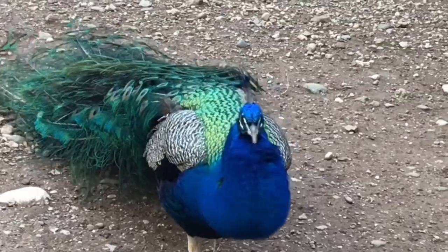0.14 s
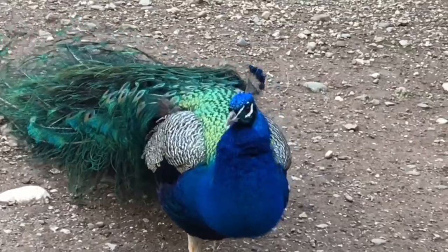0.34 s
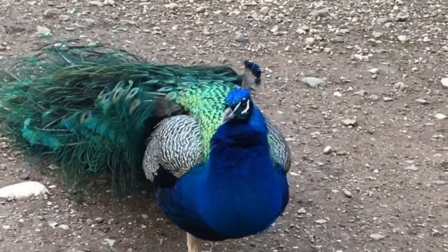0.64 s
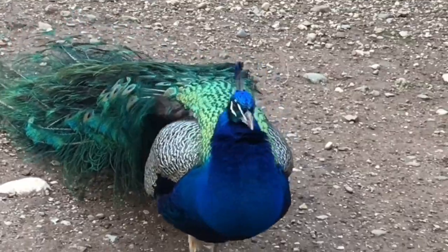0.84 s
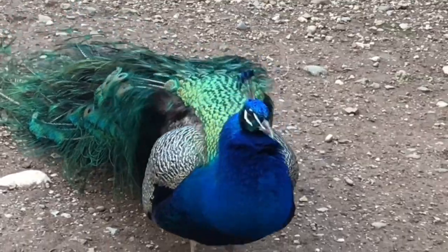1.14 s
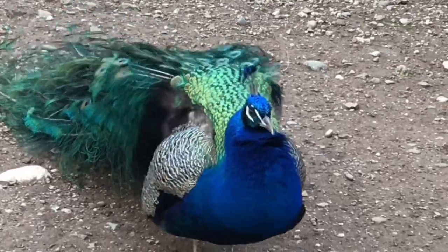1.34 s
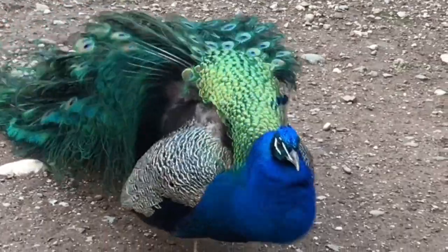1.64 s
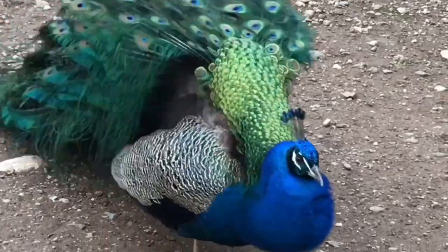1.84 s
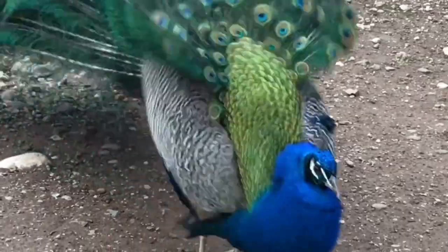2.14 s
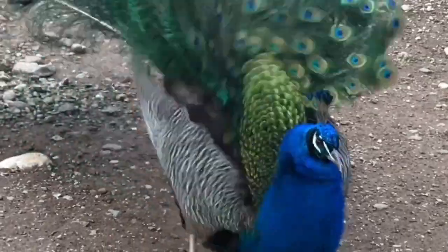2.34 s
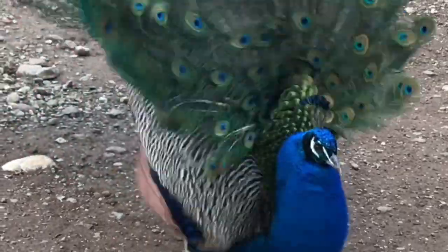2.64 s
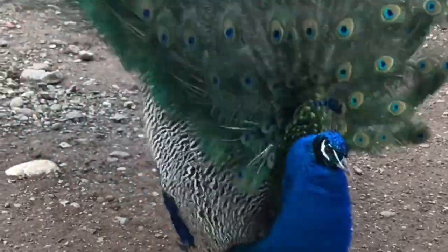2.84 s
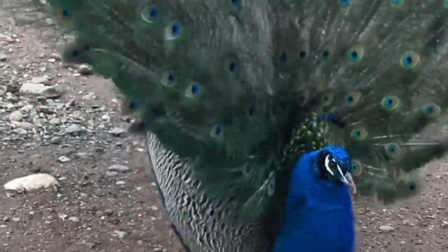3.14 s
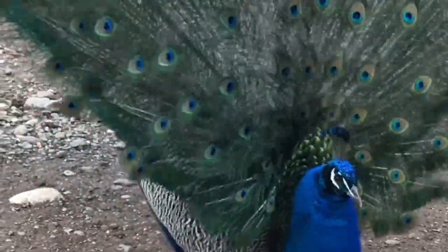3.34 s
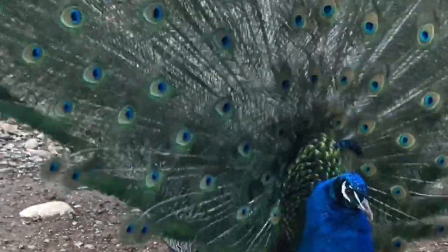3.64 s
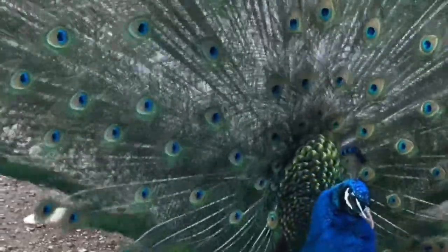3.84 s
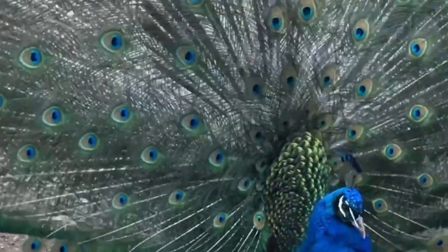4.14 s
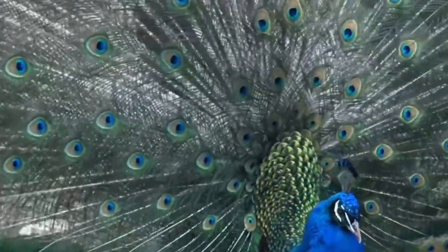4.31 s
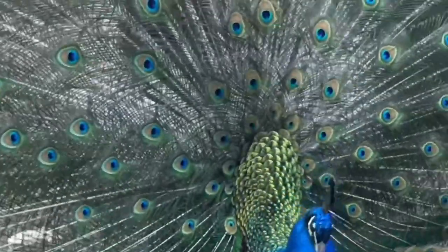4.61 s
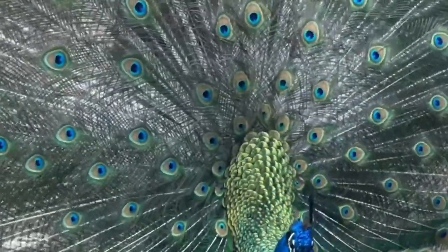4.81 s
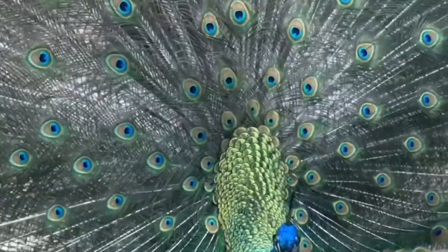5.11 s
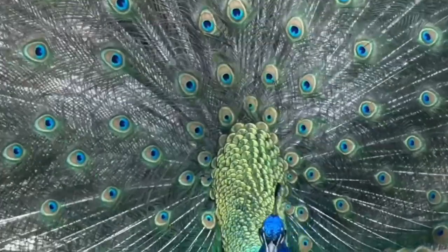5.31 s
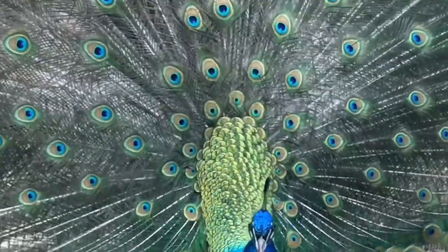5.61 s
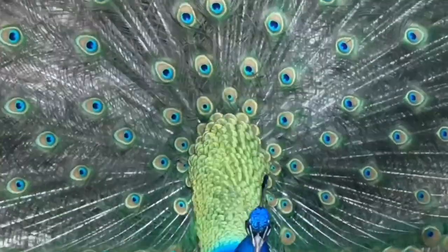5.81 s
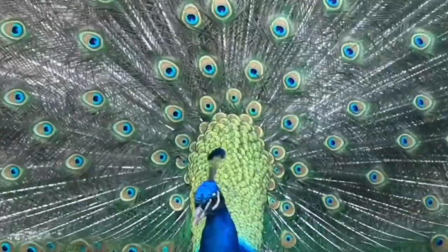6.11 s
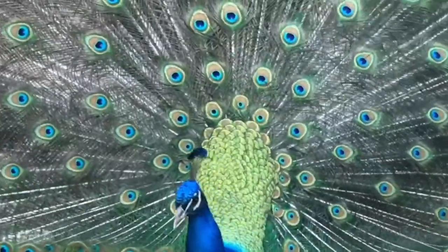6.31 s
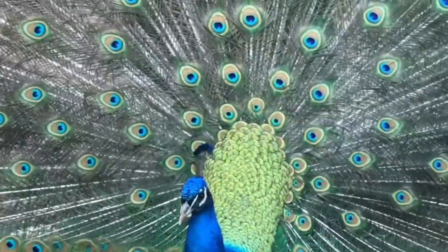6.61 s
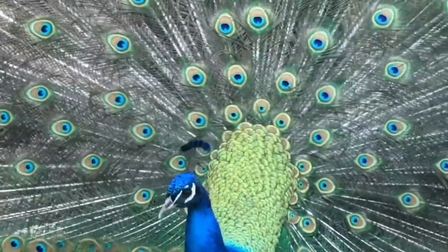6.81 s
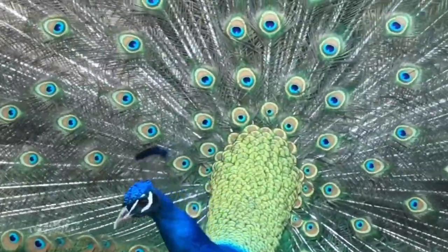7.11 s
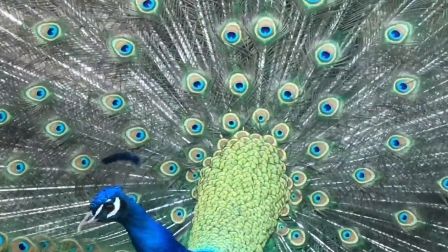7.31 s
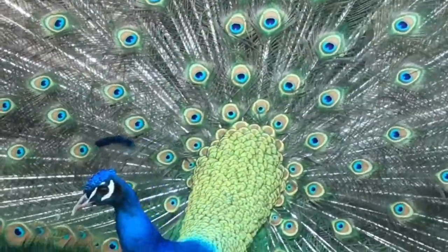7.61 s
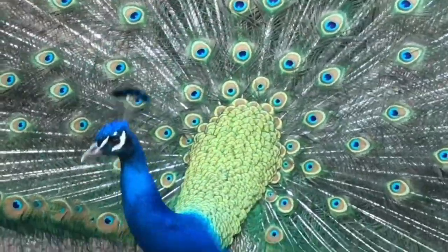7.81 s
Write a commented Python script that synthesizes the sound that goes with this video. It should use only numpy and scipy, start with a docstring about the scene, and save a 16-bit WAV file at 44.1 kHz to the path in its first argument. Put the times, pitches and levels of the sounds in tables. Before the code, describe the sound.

An open yard with soft air noise and a thin, very high insect hiss that briefly drops out near 0.8, 2.4 and 5.6 s. From the start small birds give regular falling chips and slurs, with a very faint warbling behind until about 2.4 s. At 2.4 s a dry, grainy feather rustle begins and slowly fades; quick bright twitters cluster at 2.5-3.2 s and a distant crow caws at 2.6 and 3.4 s. A pebble clicks at 3.2 s. A near peacock wails at 3.6-4.7 s, very loud: a quick scoop, a break upward, a long nasal arch, then hoarse and fluttering as it falls. A far peacock calls faintly at 3.3-4.3 and 5.0-5.7 s, with sparse twitters. The second near wail runs 6.1-7.3 s, with a thin squeal at 6.5 s and a coarse crack at 7.0 s; a caw hides beneath at 6.8 s. A faint high bird whistle follows at 7.6 s.

```python
"""Small birds chirp over an insect hiss in an open yard; then a peacock a metre or two away wails, long and loud, twice.
Each wail is a harmonic series on an arched pitch; the second harmonic carries it and flutters where the voice slips.
Roughness shakes the overtones and turns part of them to hiss pulsed at the pitch.
The train rustles as shaped noise, a pebble knocks as decaying modes, and a crow caws as pulses through resonances.
Another peacock calls far off, reduced to four harmonics; the small birds are gliding, nearly pure tones."""
import sys
import numpy as np
from scipy import signal
from scipy.fft import rfft, irfft, next_fast_len
from scipy.io import wavfile
from scipy.ndimage import uniform_filter1d, minimum_filter1d

SR = 44100
rng = np.random.default_rng(int(sys.argv[2]) if len(sys.argv) > 2 else 0)


def to_wav(sig):
    """Store sig (one row per channel, or 1-D mono) as 16-bit WAV at the path in sys.argv[1].

    Samples outside -1..1 are clipped; the rate is SR.
    """
    pcm = np.clip(np.atleast_2d(sig), -1, 1) * 32767
    pcm = np.round(pcm).astype(np.int16)
    wavfile.write(sys.argv[1], SR, pcm.T)  # frames by channels


N = 350595
TIME = np.arange(N) / SR

# spectrum of the open air: f/Hz, relative level per Hz/dB
AIR = [(25, -1.5), (50, -2.5), (90, -1.5), (170, -2), (280, -10), (600, -10.5), (1100, -18), (2000, -21.5),
       (2700, -21), (3500, -9.5), (4600, -16), (6100, -14), (6900, -32.5), (8600, -21)]
AIR_DB = -44
# dull wash of the distant surroundings: t/s, level/dB
DISTANCE = [(0, -67), (1.8, -69), (2.3, -52), (4.8, -49), (5.7, -51.5), (5.8, -64), (6.2, -45), (7.95, -51)]
# lulls in the insects' hiss: t/s, length/s, depth/dB
INSECT_LULLS = [(0.827, .27, -12), (2.448, 0.34, -13), (5.587, 0.48, -8.5)]
INSECT_DB = -48.5  # outside the lulls

# note shapes of the small birds: t from the start/s, f/Hz, relative level/dB
CHIP = [(0, 3660, -28), (.012, 4430, 2.5), (.056, 4390, -1.5), (.061, 3450, -11), (.073, 3320, 1),
        (.1, 3030, 0.5), (.125, 2500, -14), (.15, 2250, -10)]
SLUR = [(0, 5050, -13), (.03, 4610, -3.5), (.06, 4010, -4), (.1, 3380, -7.5), (.15, 2910, -10)]
TWIT = [(0, 5760, -8), (.006, 5206, 3), (.010, 4900, -1), (.015, 4480, -9.5)]
PEEP = [(0, 2700, -7), (.04, 2765, 4.5), (.09, 2650, -4), (.13, 2440, -10)]
WHISTLE = [(0, 4050, -10), (.04, 4177, 3.5), (.1, 4230, 4), (.16, 4200, -8)]
# when each note is sung: t/s, level/dB
CHIPS = [(.015, -41), (0.371, -41.5), (0.742, -41.5), (1.089, -40.5), (1.44, -41.5), (2.305, -41),
         (2.637, -40.5), (2.976, -40), (3.304, -42.5)]
SLURS = [(.01, -40.5), (0.537, -40), (1.03, -39), (1.83, -40), (2.79, -43), (3.1, -43)]
PEEPS = [(2.9, -42.5)]
WHISTLES = [(7.577, -40)]
# twittering bursts: t/s, level/dB
TWIT_BURSTS = [(2.5, -28.5), (2.577, -29.5), (2.663, -28.5), (2.757, -29), (2.837, -35), (2.941, -37.5),
               (3.045, -36.5), (3.156, -36), (3.449, -42), (4.389, -32), (4.486, -33), (5.419, -39.5),
               (5.504, -37.5), (5.585, -35.5), (5.678, -36)]
# notes within each burst: t from the burst/s, relative level/dB
TWIT_STROKES = [(0, -2), (.022, -2), (.05, -11)]

# spectrum of the rustling feathers: f/Hz, relative level per Hz/dB
FEATHERS = [(1000, 0), (3000, 4.5), (5500, 8.5), (7000, -1.5), (7700, -12), (8600, -0.5), (10500, -18),
            (11600, -22.5), (15000, -48)]
# the long feathers brush each other as the train rises, then settle
TRAIN_START_S, TRAIN_RISE_S, TRAIN_DB, TRAIN_FADE_DB_PER_S = 2.44, 0.046, -45.5, -0.94

# a distant crow's caws: t/s, length/s, level/dB
CAWS = [(2.55, 0.43, -40.5), (3.448, 0.64, -38), (6.836, 0.398, -34.5)]
# the crow's throat resonances: f/Hz, nominal width/Hz, relative level/dB
CROW_THROAT = [(850, 153, 5), (1090, 170, 3.5)]

# knocks of a pebble under a foot: t/s, level/dB
KNOCKS = [(3.2125, -25), (3.2152, -21), (3.2194, -32)]
# modes of the pebble: f/Hz, relative level/dB, t60/s
PEBBLE = [(640, -10, 0.032), (1550, -8.5, .025), (1770, -1, 0.011), (3140, -6, .012), (4540, -15, .01)]

# a far peacock's wails: start t/s, top t/s, end t/s, top pitch f/Hz, droop/(Hz per s squared), level/dB
FAR_WAILS = [(3.337, 3.787, 4.3, 807, 503, -43.5), (4.968, 5.273, 5.73, 807.3, 1020, -44.5)]

# near wails, each a lead-in, a break and a long arch: start t/s, break t/s, hoarsest t/s, end t/s,
# pitch that the lead-in reaches f/Hz, level/dB, level change of the overtones at low pitch/dB
WAILS = [(3.629, 3.743, 4.31, 4.662, 687.2, 1, -3.5), (6.126, 6.276, 6.99, 7.312, 671.2, -0.5, -7)]
# the arch of both wails from break to end: share of its length (0-1), pitch f/Hz, roughness (0-1)
ARCH = [(0, 669, 0.48), (.022, 748.8, 0.47), (.05, 801.7, 0.77), (.1, 840.6, 0.52), (.2, 870, 0.37),
        (.3, 879.4, 0.15), (.43, 879.3, 0.26), (.52, 863.5, .25), (.61, 823, .3), (.77, 772, 0.37),
        (1, 665.7, 0.42)]
# throat in each wail, shaping harmonics 1 to 4: f/Hz, level/dB
THROAT_1 = [(680, -36.5), (800, -23), (860, -29), (885, -39), (1380, -41), (1425, -19.5), (1540, -7.5),
            (1770, -6), (1900, -22), (2030, -19), (2110, -10.5), (2220, -13.5), (2630, -31), (2700, -16.5),
            (2980, -40.5), (3300, -34.5), (3500, -44)]
THROAT_2 = [(600, -46), (780, -27), (870, -22.5), (1200, -25.5), (1370, -29.5), (1460, -9), (1765, -5),
            (1830, -34.5), (2030, -24.5), (2300, -31.5), (2550, -48.5), (2680, -35.5), (3150, -46.5),
            (3500, -25.5)]
# open beak in each wail, shaping harmonics 5 and up: f/Hz, level/dB
BEAK_1 = [(3000, -28), (3900, -32.5), (4400, -40.5), (4750, -27), (5050, -36), (5190, -20), (5310, -19),
          (5520, -43), (6100, -27), (7050, -39), (7800, -44), (8400, -33.5), (9800, -41), (11200, -40.5),
          (12800, -43), (15500, -48)]
BEAK_2 = [(3000, -19), (4000, -31.5), (4450, -35), (4900, -41), (5250, -31.5), (5520, -40), (6100, -29),
          (7000, -30.5), (7700, -46.5), (8300, -26), (9000, -35.5), (9550, -27), (10500, -42), (11400, -38),
          (12400, -44), (15500, -46.5)]
# bouts of slips that weaken the second harmonic: t/s, length/s, least depth (0-1)
SLIPS = [(3.843, 0.011, 0.7), (3.913, 0.015, 0.74), (3.951, 0.011, 0.88), (4.002, 0, 0.76), (4.121, 0, .95),
         (4.175, 0.037, 1), (4.29, 0.054, 0.58), (6.379, 0.047, 0.66), (6.48, 0.026, 0.6),
         (6.698, 0.071, 0.72), (6.927, 0.018, 0.88), (7.03, 0.025, .9)]
SLIP_GAP_S = 0.02  # approximate spacing of slips within a bout
SCOOP_HZ = 84.8  # rise of pitch over the lead-in
ATTACK_S, RELEASE_S = 0.023, 0.035
TOP_PITCH_HZ, LOW_PITCH_HZ = 880, 670
DULL_DB_PER_KHZ = -1.3  # extra change of the overtones at low pitch
BLOOM_DB, BLOOM_S = -16.5, 0.041  # harmonics above the second start this much weaker and swell in
BREAK_DIP_DB, BREAK_DIP_S = -3, 0.021  # the voice falters just after the break
HOARSE, HOARSE_S = 0.38, 0.076  # extra roughness on the way down, and its half width at 1/e
RASP_POWER = 1.8  # exponent from roughness to hiss

# a thin second voice from the other side of the syrinx: t from the start/s, f/Hz, relative level/dB
SQUEAL = [(0, 4100, -17), (.035, 4156, -5), (.07, 4180, 4), (.11, 4200, -5), (.15, 4170, -21)]
# when it sounds: t/s, level/dB
SQUEALS = [(6.476, -32)]
# the voice cracks into a short, coarse squawk: t/s, length/s, level/dB
CRACKS = [(7.02, 0.038, -23)]
# resonances of the squawk: f/Hz, nominal width/Hz, relative level/dB
CRACK_RING = [(1218, 31, 6), (4300, 770, -24), (7400, 3400, -34)]

YARD_T60_S, YARD_TREBLE_T60_S = 1.1, 0.55
TOP_HZ = 15350  # upper band limit


def undb(db):
    """Amplitude gain is ten to the power of the level in dB over 20."""
    return 10 ** (np.asarray(db) / 20)


def unit(x):
    """Division by the root mean square gives a signal of rms 1."""
    return x / np.sqrt(np.mean(x ** 2))


def curve(rows, t):
    """Linear interpolation of every column of a table against its first."""
    s, *columns = np.transpose(rows)
    return [np.interp(t, s, c) for c in columns]


def shape(points, hz):
    """Gain of a spectrum whose level in dB is interpolated over log frequency."""
    f, db = np.transpose(points)
    return undb(np.interp(np.log(hz + 1), np.log(f), db))


def add(out, start, x):
    """Superposition: mix x into out from time start."""
    i = max(int(start * SR), 0)
    out[i:i + len(x)] += x[:len(out) - i]


def noise_with_spectrum(gain, size):
    """White Gaussian noise coloured by multiplying its spectrum by a gain."""
    return irfft(rfft(rng.standard_normal(size)) * gain, size)


def resonate_twice(x, hz, width_hz):
    """Two equal two-pole resonances in cascade, each of this width, with gain 1 at the centre."""
    b, a = signal.iirpeak(hz, hz / width_hz, SR)
    return signal.lfilter(b, a, signal.lfilter(b, a, x))


def wobble(size, hz):
    """Random modulation of about rms 1 whose spectrum rolls off above hz."""
    f = np.fft.rfftfreq(next_fast_len(size + SR // 4, True), 1 / SR)
    spectrum = rng.standard_normal(len(f)) + 1j * rng.standard_normal(len(f))
    return unit(irfft(spectrum / np.sqrt(1 + (f / hz) ** 4)))[:size]


def span(rows, fade):
    """The sample times that a table covers, and a gate with linear ramps of fade seconds."""
    t = np.arange(rows[0][0], rows[-1][0], 1 / SR)
    return t, np.clip(np.minimum(t - t[0], t[-1] - t) / fade, 0, 1)


def open_air(edge_hz=10000):
    """Broadband noise: a random pressure with a falling spectrum and a steep upper edge."""
    f = np.fft.rfftfreq(N, 1 / SR)
    air = unit(noise_with_spectrum(shape(AIR, f) / np.sqrt(1 + (f / edge_hz) ** 40), N))
    return air * undb(AIR_DB + 0.27 * wobble(N, 6.1))


def distant_wash(centre_hz=650, width_hz=1100):
    """Filtered noise: a broad resonance dulls it while its level comes and goes."""
    wash = resonate_twice(rng.standard_normal(N), centre_hz, width_hz)
    level_db, = curve(DISTANCE, TIME)
    return unit(wash) * undb(level_db)


def insects(centre_hz=9950, width_hz=1200, break_off_s=0.027, stroke_hz=146.5):
    """Amplitude modulation: wing strokes chop a narrow band of noise that breaks off and swells back."""
    f = np.fft.rfftfreq(N, 1 / SR)
    hiss = noise_with_spectrum(np.exp(-2 * ((f - centre_hz) / width_hz) ** 2), N)
    stroke_phase = 2 * np.pi * np.cumsum(stroke_hz * (1 + 0.012 * wobble(N, 5))) / SR
    strokes = 1 + 0.5 * np.sin(stroke_phase)
    level_db = np.full(N, INSECT_DB)
    for s, length, depth_db in INSECT_LULLS:
        level_db += np.interp(TIME - s, [0, break_off_s, length], [0, depth_db, 0])
    return unit(hiss * strokes) * undb(level_db)


def songbird(note, times, waver, octave_db, vary=0.0128, flicker_db=2):
    """Frequency modulation: a gliding tone and its octave, varied in pitch and level at each repeat."""
    out = np.zeros(N)
    t, gate = span(note, fade=0.0013)
    hz, db = curve(note, t)
    for s, level_db in times:
        # the voice wavers most on its highest notes
        bend = vary * rng.uniform(-1.043, 1) + waver * (hz / hz.max()) ** 4 * wobble(len(t), 190)
        phase = 2 * np.pi * np.cumsum(hz * (1 + bend)) / SR
        size = gate * undb(db + level_db + flicker_db * wobble(len(t), 70))
        tone = np.sin(phase) + undb(octave_db) * np.sin(2 * phase)
        add(out, s, size * np.sqrt(2) * tone)
    return out


def foliage(x, scatter=0.54, decay_s=0.0086):
    """Multiple scattering: leaves and branches round a perched bird blur its notes with close reflections."""
    t = TIME[:SR // 50]
    paths = rng.standard_normal(len(t)) * np.exp(-t / decay_s)
    reflections = signal.fftconvolve(x, paths / np.sqrt(np.sum(paths ** 2)))[:N]
    return (x + scatter * reflections) / np.hypot(1, scatter)


def warbler(start=0.2, end=2.4, level_db=-57, low_hz=1850, high_hz=3300, count=28):
    """Linear chirps: a far songbird rambles through short tones, each gliding up or down."""
    out, t = np.zeros(N), TIME[:SR // 18]
    for when, pitch, glide in rng.random((count, 3)):
        middle_glide = 1 + 0.283 * (glide - 0.5) * t / t[-1]
        hz = (low_hz + pitch * (high_hz - low_hz)) * middle_glide
        tone = np.hanning(len(t)) * np.sin(2 * np.pi * np.cumsum(hz) / SR)
        add(out, start + when * (end - start), undb(level_db) * unit(tone))
    return out


def train(grain_db=4):
    """Stick-slip friction: countless catching barbs sum to a fine, dry, grainy noise."""
    slips = rng.standard_normal(N) * undb(grain_db * wobble(N, 300))
    rustle = irfft(rfft(slips) * shape(FEATHERS, np.fft.rfftfreq(N, 1 / SR)), N)
    age = TIME - TRAIN_START_S
    rise = np.clip(age / TRAIN_RISE_S, 0, 1)
    return unit(rustle) * rise * undb(TRAIN_DB + TRAIN_FADE_DB_PER_S * age)


def crow(pulse_hz=49, arch=0.0497, noise_db=0):
    """Source and filter: slow pulses, arching a little in rate, and noise ring two throat resonances."""
    out = np.zeros(N)
    for s, length, db in CAWS:
        n = int(length * SR)
        rise_and_fall = arch * (np.sin(np.pi * np.arange(n) / n) - 1)
        rate = pulse_hz * (1 + rise_and_fall + 0.0063 * wobble(n, 39))
        pulses = np.diff(np.floor(np.cumsum(rate) / SR), prepend=0)
        source = unit(pulses) + undb(noise_db) * rng.standard_normal(n)
        # the cascade narrows the band, so each stage is wider than nominal
        voice = sum(undb(d) * resonate_twice(source, f, 1.45 * w) for f, w, d in CROW_THROAT)
        add(out, s, undb(db) * unit(voice) * signal.windows.tukey(n, 0.45))
    return out


def pebble():
    """Modal decay: each knock excites the stone's modes, which die away exponentially."""
    out, t = np.zeros(N), TIME[:SR // 20]
    ring = np.zeros(len(t))
    for hz, db, t60 in PEBBLE:
        ring += undb(db) * np.sin(2 * np.pi * hz * t) * np.exp(-np.log(1000) * t / t60)
    for s, db in KNOCKS:
        add(out, s, undb(db) * ring)
    return out


def far_wail(start, top, end, top_hz, droop, db, first_db=-14, third_db=-19, fourth_db=-17):
    """Harmonic series on a parabolic pitch: from far off little but the second harmonic arrives."""
    t = np.arange(start, end, 1 / SR)
    hz = top_hz - droop * (t - top) ** 2
    phase = 2 * np.pi * np.cumsum(hz * (1 + 0.007 * wobble(len(t), 90))) / SR
    harmonics = enumerate([first_db, 0, third_db, fourth_db], 1)
    cry = sum(undb(d) * np.sin(k * phase) for k, d in harmonics)
    return signal.windows.tukey(len(t), 0.3) * undb(db) * cry * np.sqrt(2)


def gesture(start, brk, hoarsest, end, lead_hz):
    """Source control: times, pitch, roughness and envelope of a wail that scoops up, breaks and arches."""
    t = np.arange(start, end + RELEASE_S, 1 / SR)
    arch_hz, rough = curve(ARCH, (t - brk) / (end - brk))
    rough = rough + HOARSE * np.exp(-((t - hoarsest) / HOARSE_S) ** 2)
    lead = lead_hz - SCOOP_HZ * ((brk - t) / (brk - start)) ** 2
    hz = uniform_filter1d(np.where(t < brk, lead, arch_hz), size=500)
    envelope = np.clip(np.minimum((t - start) / ATTACK_S, (t[-1] - t) / RELEASE_S), 0, 1)
    falter = undb(BREAK_DIP_DB * np.exp(-((t - brk) / BREAK_DIP_S - 1) ** 2))
    return t, hz, np.clip(rough, 0, 1), envelope * falter


def flutter(t, slip_s=0.0045, scatter_s=0.001):
    """Complex modulation: at each slip the strong harmonic collapses and returns while its phase swings."""
    gain = np.ones(len(t), complex)
    for start, length, least_depth in SLIPS:
        for s in np.linspace(start, start + length, 1 + round(length / SLIP_GAP_S)):
            s = s + scatter_s * rng.standard_normal()
            depth = min(least_depth * rng.uniform(1.0, 1.29), 1)
            turn = rng.choice([-1, 1])
            gain *= 1 - depth / (1 + 1j * turn * (t - s) / slip_s)
    # the power over 3500 samples is evened out, leaving the fast flutter
    return gain / np.sqrt(uniform_filter1d(abs(gain) ** 2, size=3500))


def wail(row, throat, beak, jitter=0.019, shimmer=0.83, skirt_db=-25, rasp_db=-4,
         sway_db=2, rough_sway_db=4, low_sway_db=1.9):
    """Source and filter: the syrinx's harmonics; hoarseness shakes its cycles and adds hiss pulsed at the pitch."""
    start, brk, hoarsest, end, lead_hz, level_db, slack_db = row
    t, hz, rough, envelope = gesture(start, brk, hoarsest, end, lead_hz)
    n = len(t)
    drift = jitter * rough ** 2 * wobble(n, 160) + 0.0026 * rough * wobble(n, 35)
    phase = 2 * np.pi * np.cumsum(hz * (1 + drift)) / SR

    def partial(order):
        """Random modulation: one harmonic with its own tremble, the low orders being steadiest."""
        tremble = shimmer * min(1, order / 6) * rough * (wobble(n, 70) + 1j * wobble(n, 70))
        return np.sqrt(2) * np.real((1 + tremble) * np.exp(1j * order * phase + 2j * np.pi * rng.random()))

    # the throat resonance sits on the second harmonic at high pitch, on the third at low pitch
    skirt = undb(skirt_db) * rough * (wobble(n, 130) + 1j * wobble(n, 130))
    second = np.sqrt(2) * np.real((flutter(t) + skirt) * np.exp(2j * phase))
    cry = shape(throat, 2 * hz) * second
    bloom = undb(BLOOM_DB * np.exp(-(t - start) / BLOOM_S))
    for k in (1, 3, 4):
        low_sway = undb(low_sway_db * np.sqrt(k) * wobble(n, 21))
        cry += (bloom if k > 2 else 1) * shape(throat, k * hz) * low_sway * partial(k)

    # overtones swell and fade as they sweep through the beak's resonances, and dull as the pitch sinks
    orders = np.arange(5, 19)
    freqs = orders[:, None] * hz
    slack = (TOP_PITCH_HZ - hz) / (TOP_PITCH_HZ - LOW_PITCH_HZ)
    dulling_db = slack * slack_db + slack ** 2 * DULL_DB_PER_KHZ * freqs / 1000
    gains = bloom * shape(beak, freqs) * undb(dulling_db)
    sway = undb((sway_db + rough_sway_db * rough) * np.array([wobble(n, 11) for _ in orders]))
    overtones = (gains * sway * np.array([partial(k) for k in orders])).sum(0)
    # the hoarser the voice, the more of the overtones turns to hiss
    cry += np.sqrt(1 - 0.7 * rough ** 2) * overtones
    f = np.fft.rfftfreq(n, 1 / SR)
    colour = shape(beak, f) ** 0.22 / np.sqrt(1 + (3200 / (f + 1)) ** 6) / (1 + (f / 13000) ** 10)
    hiss = unit(noise_with_spectrum(colour, n))
    hiss_size = undb(rasp_db) * rough ** RASP_POWER * np.sqrt((gains ** 2).sum(0))
    cry += hiss_size * hiss * (1 + np.cos(phase))
    return cry * envelope * undb(level_db)


def crack():
    """Chaotic vibration: a burst of noise rings the throat's resonances."""
    out = np.zeros(N)
    for s, length, db in CRACKS:
        noise = rng.standard_normal(int(length * SR))
        ring = sum(undb(d) * resonate_twice(noise, f, 1.5 * w) for f, w, d in CRACK_RING)
        add(out, s, undb(db) * unit(ring * np.hanning(len(ring))))
    return out


def yard(x, delay_s=0.015, bright_hz=3400):
    """Reverberation: scattered echoes from trees and walls decay exponentially, the treble sooner."""
    t = TIME[:SR + SR // 2]
    noise = rng.standard_normal(len(t))
    low = signal.sosfilt(signal.butter(4, bright_hz, fs=SR, output="sos"), noise)
    tail = low * undb(-60 * t / YARD_T60_S)
    tail += 0.3 * rng.standard_normal(len(t)) * undb(-60 * t / YARD_TREBLE_T60_S)
    tail *= 1 - np.exp(-(t / delay_s) ** 2)  # the echoes build up gradually
    return signal.fftconvolve(x, tail / np.sqrt(np.sum(tail ** 2)))[:N]


def scene(near_echo_db=-27, far_echo_db=-15):
    """Direct and reverberant sound: the near peacock almost dry, the other birds with more of the yard."""
    birds = songbird(CHIP, CHIPS, waver=0.038, octave_db=-33)
    birds += songbird(SLUR, SLURS, waver=0.0375, octave_db=-30)
    birds += songbird(PEEP, PEEPS, waver=0.0052, octave_db=-16)
    birds += songbird(WHISTLE, WHISTLES, waver=0.0052, octave_db=-1.5)
    far = foliage(birds + warbler() + crow())
    twits = [(s + lag, db + stroke_db) for s, db in TWIT_BURSTS for lag, stroke_db in TWIT_STROKES]
    far += foliage(songbird(TWIT, twits, waver=0.03, octave_db=-36), scatter=0.3, decay_s=0.005)
    for row in FAR_WAILS:
        add(far, row[0], far_wail(*row))

    near = train() + pebble() + crack()
    near += songbird(SQUEAL, SQUEALS, waver=0.0033, octave_db=-4, vary=0)
    for row, throat, beak in zip(WAILS, [THROAT_1, THROAT_2], [BEAK_1, BEAK_2]):
        add(near, row[0], wail(row, throat, beak))

    echoes = yard(undb(near_echo_db) * near + undb(far_echo_db) * far)
    background = open_air() + distant_wash() + insects()
    return (near + far + echoes + background)[None]


def record(dry, ceiling=0.955, lopsided=0.035):
    """Quadratic distortion: the microphone bends under loud cries; a limiter holds peaks; the top is cut."""
    bend = signal.sosfilt(signal.butter(2, 40, "high", fs=SR, output="sos"), dry ** 2)
    sound = dry + lopsided * bend
    needed = np.minimum(1, ceiling / (abs(sound) + 1e-9))
    gain = uniform_filter1d(minimum_filter1d(needed, size=200), size=200)
    top_cut = signal.ellip(10, 0.2, 80, TOP_HZ, fs=SR, output="sos")
    return signal.sosfilt(top_cut, sound * gain)


dry = scene()
out = record(dry)
to_wav(out)
```